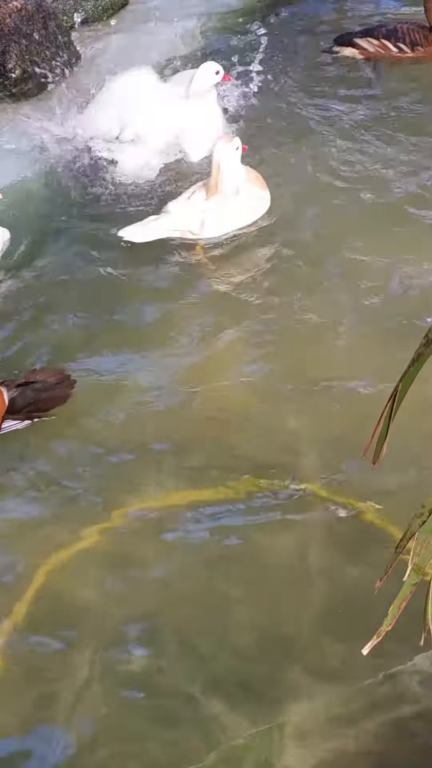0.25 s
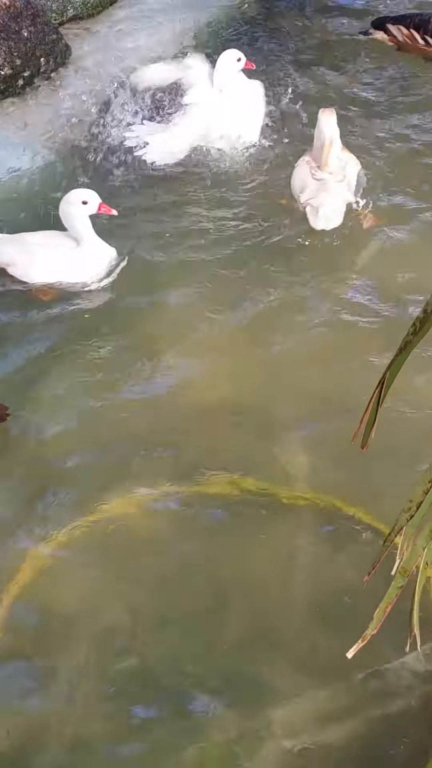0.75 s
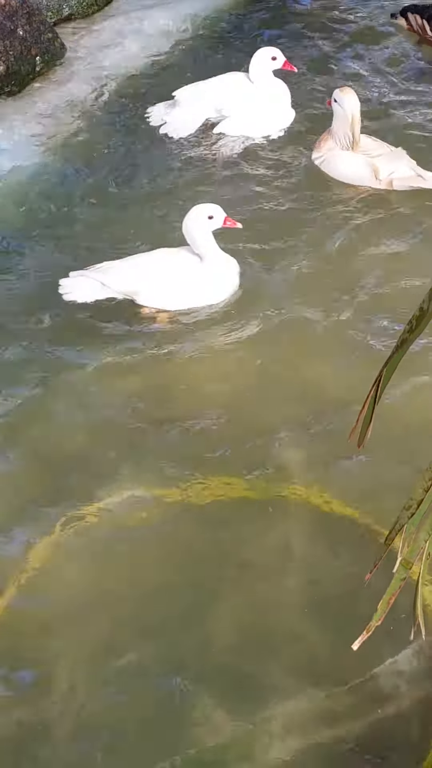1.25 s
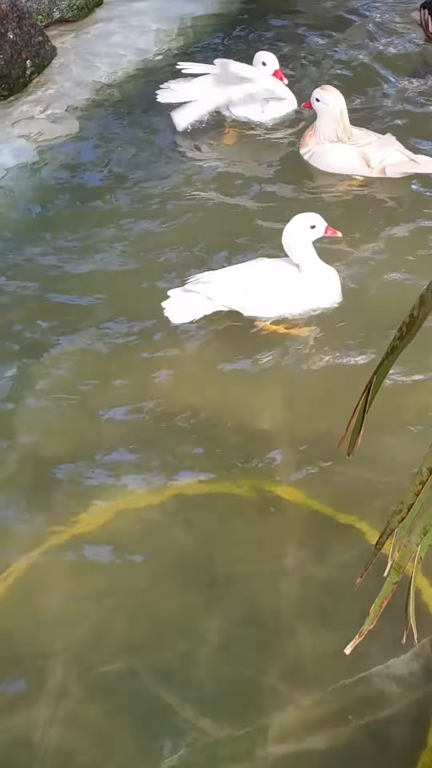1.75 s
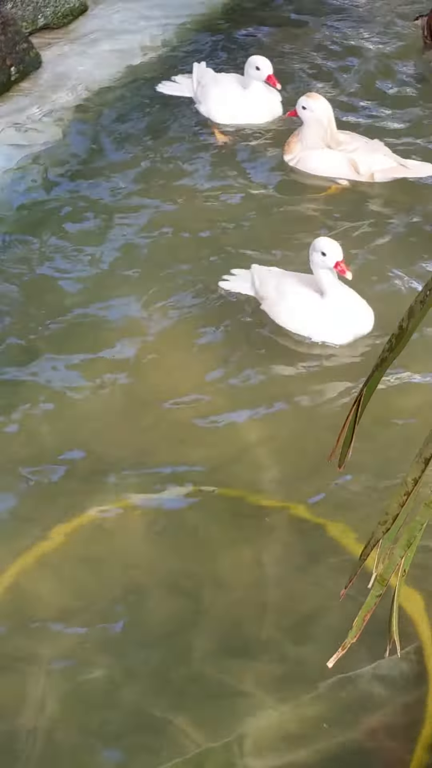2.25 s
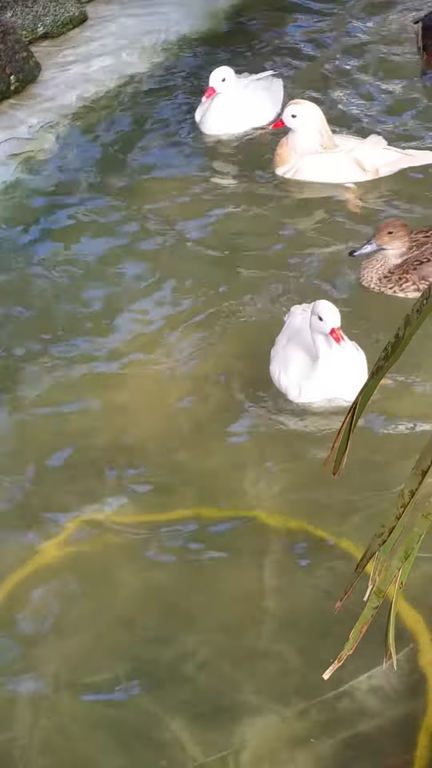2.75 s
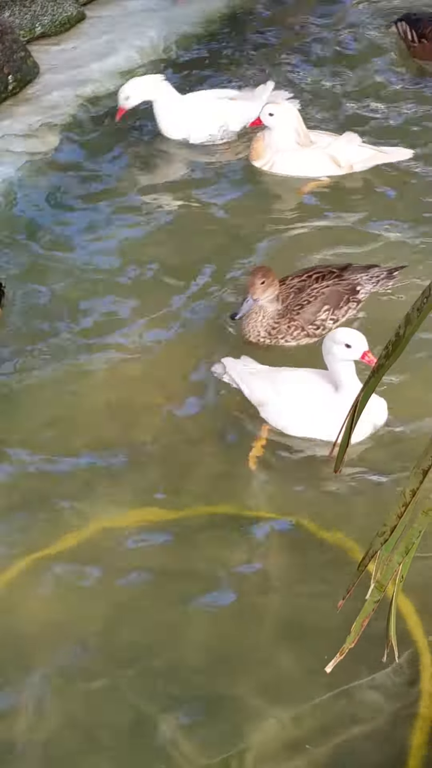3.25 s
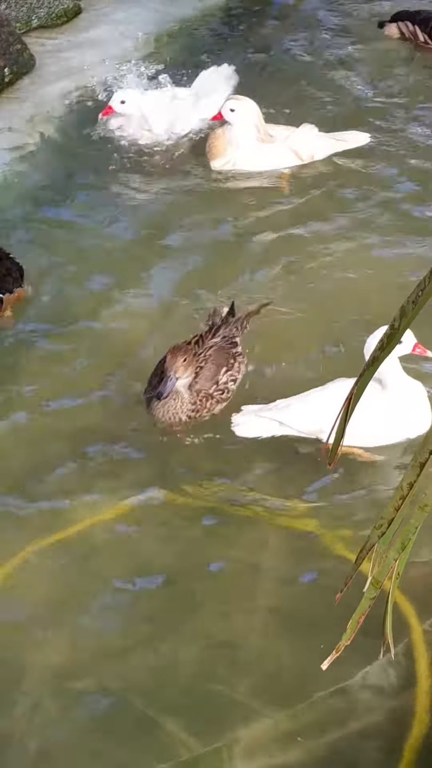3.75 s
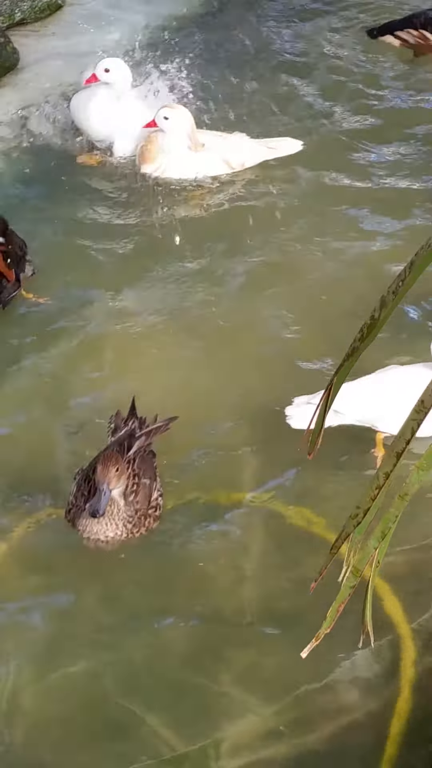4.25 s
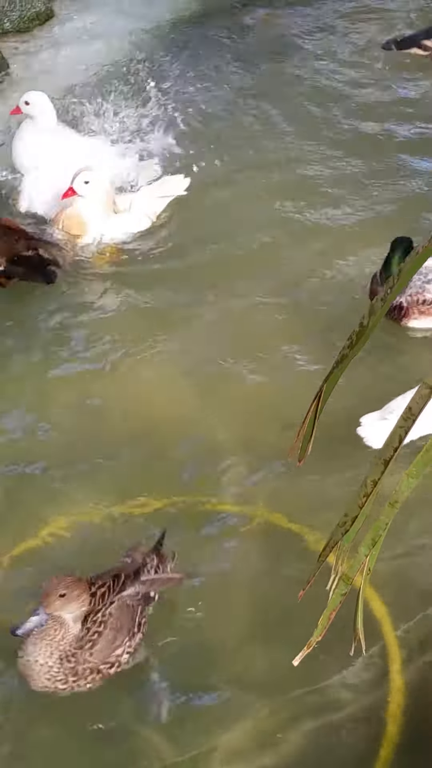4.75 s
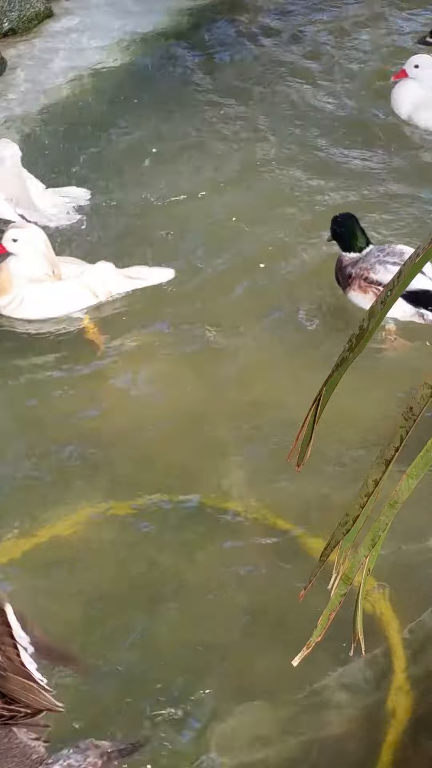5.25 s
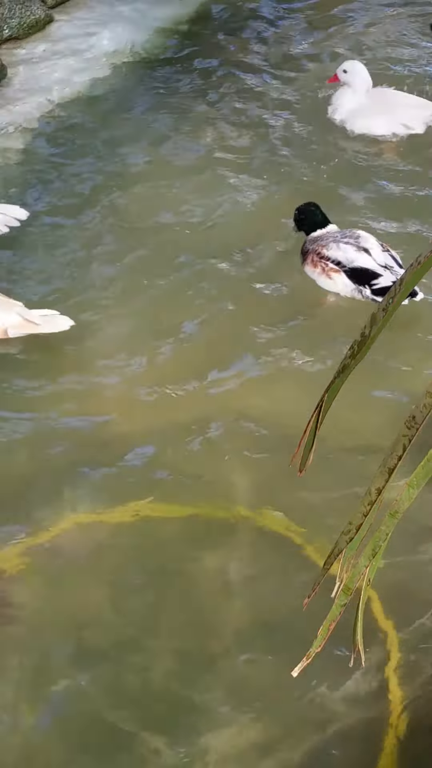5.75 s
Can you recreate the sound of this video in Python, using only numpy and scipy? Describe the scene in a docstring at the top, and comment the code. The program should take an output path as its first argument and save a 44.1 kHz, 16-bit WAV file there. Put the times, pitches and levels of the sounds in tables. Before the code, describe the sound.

Fast fluttering wing slaps splash a small pond in three bouts, bubbling and dripping between them, over short duck peeps and a low hum.

```python
"""Duck bathing in a walled pond

A duck bathes in shallow water: three bouts of wing beats, about eleven a second, slap the surface.
Each slap is enveloped noise for crack, clap, smack and spray, plus a pressure pulse and a low heave.
Drops rain back as noise ticks, and decaying, rising sines ring as bubbles, plops and gulps of air.
Other ducks peep and cluck as rasping harmonic stacks; a pump hums in wavering sines over a rumble.
Scattered echoes come from the banks, and one wall at the left returns each blow."""
import sys
import numpy as np
from scipy import signal
from scipy.fft import rfft, irfft
from scipy.io import wavfile
from scipy.ndimage import uniform_filter1d

SR = 44100
rng = np.random.default_rng(int(sys.argv[2]) if len(sys.argv) > 2 else 0)


def pcm_store(signal):
    """Save signal as 16-bit PCM."""
    levels = np.round(np.clip(np.atleast_2d(signal), -1, 1) * 32767)
    wavfile.write(sys.argv[1], SR, levels.astype(np.int16).T)


N = 264159
TIME = np.arange(N) / SR  # s

# Wing beats and flicks of water:
# (time [s], relative strength [dB], depth of the stroke [0-1], peak of its thump [dB])
WING_BEATS = [(0.002, -23, 0.61, -26), (0.0807, -15, 0.2, -22.5), (0.1679, -21, 0.48, -32),
              (0.25, -17, 0.29, -18), (0.338, -17, 0.3, -28), (0.3459, -41, 0.82, -16),
              (0.4233, -14, 0.12, -28), (0.512, -16, 0.45, -21), (0.599, -15.5, 0.3, -24),
              (0.6892, -19, 0.58, -23), (0.7809, -21, 0.53, -22), (0.8599, -38, 0.48, -12.5),
              (0.897, -29, 0.63, -30.5), (1.119, -27.5, 0.42, -27), (1.216, -37, 0, -50.5),
              (1.3632, -30, 0, -50), (1.901, -33, 0, -50), (2.247, -32, 0.66, -47),
              (2.3452, -26, 0.1, -48.5), (2.352, -30.5, 0.1, -48), (2.4087, -21.5, 0.02, -40),
              (2.5125, -15, 0.08, -26), (2.5984, -13.5, 0.16, -15.5), (2.688, -14, 0.23, -12),
              (2.7796, -14.5, 0, -27), (2.8699, -12.5, 0, -22), (2.963, -24, 0.4, -30),
              (2.9668, -14, 0.2, -22), (3.0645, -13.5, 0, -18), (3.1611, -14, .05, -23),
              (3.2545, -20.5, 0.27, -29), (3.262, -16, 0.26, -18), (3.3639, -16.5, 0.31, -22.5),
              (3.4706, -17, 0.18, -24), (3.5821, -15.5, 0.23, -17), (4.082, -26.5, 0, -45),
              (4.1845, -21, 0.63, -18), (4.2699, -19.5, 0.7, -21.5), (4.3489, -26.5, 0.87, -15),
              (4.434, -17.5, 0.27, -23), (4.516, -22.5, 0.86, -12.5), (4.603, -16.5, 0.48, -19),
              (4.681, -21, 0.67, -19), (4.7719, -13, 0.13, -29), (4.855, -14, 0.25, -31),
              (4.892, -18, 0.36, -32), (4.955, -20.5, 0.38, -36.5), (5.0667, -23, 0.43, -24),
              (5.326, -24.5, 0, -48), (5.5366, -26.5, 0.3, -35)]
# What a wing that digs in fully gains over one that skims the surface [dB]
DEEP_SMACK_DB, DEEP_SPRAY_DB, DEEP_HEAVE_DB = 16.5, 17.5, 32
# Half width of a skimming wing's pressure pulse [s], and how many times wider when it digs in fully
THUMP_S, THUMP_WIDENS = 0.00012, 10.6
WALL_S = 0.00306  # delay of the wall's echo

# Noise colours of the slap's layers, the drops and the churned water:
# (frequency [Hz], relative density [dB per Hz])
CRACK_SPECTRUM = [(100, -70), (2000, -16), (5500, -28.5), (7500, -8), (9500, -1.5), (11500, -1),
                  (14500, -10)]
CLAP_SPECTRUM = [(150, -17), (600, 0.5), (1100, 2.5), (2500, 1), (4000, -3), (6500, -2.5), (12000, -9)]
SMACK_SPECTRUM = [(50, -52), (130, 9.5), (400, -1.5), (1100, 3.5), (2400, 8), (4000, -6), (7000, 0.5),
                  (14000, -1)]
SPRAY_SPECTRUM = [(80, -6), (200, -14), (1000, -12.5), (2500, -7), (5000, -8), (7000, -6), (9000, -2),
                  (11500, 0), (14500, -9.5)]
DROP_SPECTRUM = [(100, -52), (2000, -7.5), (4000, -7), (6000, -12), (8000, -5.5), (8600, -0.5),
                 (11500, -0.5), (14500, -5.5)]
CHURN_SPECTRUM = [(30, -35), (90, -3), (180, 11.5), (400, -12.5), (1000, 3), (2300, 4), (3800, -13),
                  (6000, -15), (12000, -11)]

# The pond stirs with each bout and settles after it:
# (time [s], relative level of falling drops [dB], relative level of churning water [dB])
WATER_LEVELS = [(0.0, -32, -31.5), (0.6, -34.5, -35.5), (0.77, -36.5, -31.5), (0.9, -41.5, -43.5),
                (1.1, -51, -47.5), (1.52, -49.5, -51.5), (2.19, -45, -47.5), (2.77, -34.5, -39.5),
                (2.92, -31.5, -38.5), (3.0, -31.5, -36), (3.13, -30, -36), (3.42, -34, -39.5),
                (3.55, -38.5, -35.5), (3.74, -43, -43), (4.07, -41, -42.5), (4.37, -34.5, -32),
                (4.5, -33.5, -35.5), (4.92, -35.5, -36.5), (5.1, -39.5, -42), (5.34, -42, -44.5),
                (5.5, -42, -42.5), (5.55, -39.5, -37), (5.68, -38.5, -41), (5.99, -39.5, -39.5)]

# Hum lines of the pump, before waver and swell: (frequency [Hz], level [dB rms])
PUMP_LINES = [(118.3, -46), (183, -58.5), (225.5, -56), (239, -64), (296, -64), (591.5, -66)]
# Swell shared by the hum and the rumble: (time [s], gain [dB])
PUMP_SWELL_CURVE = [(0, -1), (1.3, -1.5), (2.3, -0.5), (3.6, -5), (4.8, 1), (5.3, -3), (5.6, 1.5), (6, 2)]
# Colour of the low rumble: (frequency [Hz], relative density [dB per Hz])
RUMBLE_SPECTRUM = [(20, 5.5), (45, 7.5), (90, 9), (160, 3.5), (250, 2.5), (400, -19), (650, -10),
                   (1000, -12), (1300, -18), (3000, -32), (8000, -63)]

# Peeps and squeaks: (time [s], length [s], level [dB], pitch mid-call [Hz], hoarseness [0-1],
# tilt of the overtones [dB per octave], depth of the rasp [ratio])
PEEP_CALLS = [(0.008, 0.07, -30, 1417, 0.15, -2.5, 0.5), (0.192, 0.069, -29, 1424, 0.25, -2, 0.68),
              (0.337, 0.047, -25, 1420, 0.7, -2, .25), (0.465, 0.053, -25.5, 1516, 0.14, -2.5, 0.38),
              (0.624, 0.058, -27, 1515, 0, -6, .35), (0.636, 0.03795, -29, 1404, .05, -10, .25),
              (2.412, 0.05, -33.5, 1310, 0.2, -19, .7), (5.258, .038, -37.5, 1403, 0.08, -28, 1.7),
              (5.878, .04, -36.5, 2080, .05, -7, 1.7)]
# Throat resonance of the peeps: (frequency [Hz], gain [dB])
PEEP_THROAT_CURVE = [(700, -25.5), (1450, -3), (2100, 0.5), (2800, 7), (3600, 8), (4300, 6.5), (5000, 6.5),
                     (5800, -1), (7500, -11), (9000, 9.5), (10000, -16)]
PEEP_TILT_HZ = 2747.4  # the tilt acts above this
CLUCK_S, CLUCK_LENGTH_S, CLUCK_DB, CLUCK_HZ = 2.002, .043, -32, 365  # pitch and level at its start
CLUCK_SAG, CLUCK_FADE_DB = 0.2327, 26  # share of its pitch, and level, that the cluck loses by its end
# Throat resonance of the cluck: (frequency [Hz], gain [dB])
CLUCK_THROAT_CURVE = [(350, 2.5), (760, 7.5), (1130, 3), (1550, -10), (2300, -31.5), (3500, -43.5)]

# Large pockets of air that the water closes over:
# (time [s], level [dB], starting pitch [Hz], splash around it relative to the level [dB])
PLOP_POCKETS = [(0.128, -23, 968.3, -1), (0.130, -24, 2200, -9), (0.181, -18.5, 792.5, 1),
                (0.292, -26, 652.5, -1), (0.344, -20.5, 773, -15), (0.345, -15, 610, -6),
                (0.455, -22.5, 653, 0), (0.520, -25.5, 296.8, -6), (0.598, -16, 2210, -16),
                (0.611, -22, 179.7, -3.5), (0.615, -25, 567, -13), (0.689, -18, 2370, 0),
                (0.781, -25, 270, -4.5), (0.783, -22.5, 1810, -8.5), (0.852, -22, 2090, -6),
                (0.859, -24.5, 587.7, -11), (0.860, -27, 222, -1), (0.861, -19.5, 928.7, -25),
                (0.880, -23, 828.8, -22), (1.073, -20.5, 1597, -15), (1.104, -17.5, 325.5, -13.5),
                (1.106, -24.5, 1262, -16), (1.141, -36, 1650, -1), (1.145, -29, 1220, -11),
                (1.809, -38, 2013, -2), (1.915, -32, 2144, -9.5), (2.073, -39, 1110, -7),
                (2.129, -29, 1100, -5.5), (2.132, -34, 2200, -6), (2.192, -38, 2400, 1),
                (2.272, -33.5, 1610, -5), (2.597, -25, 951.4, -23.5), (2.655, -26.5, 1089, -1),
                (2.748, -25, 950, -3), (2.779, -31.5, 232, -16), (2.838, -32, 1180, -6),
                (2.945, -30.5, 415, 5), (2.967, -18, 2260, -9.5), (3.004, -27.5, 462.9, -3.5),
                (3.019, -27, 1437, -2), (3.039, -26.5, 1010, -1), (3.049, -23, 139.4, -6.5),
                (3.063, -29, 860.7, -6), (3.090, -25, 2330, -18), (3.161, -23.5, 2370, -2),
                (3.341, -29, 1030, 1.5), (3.434, -26, 3170, 1.5), (3.520, -32, 1080, -10),
                (3.581, -22.5, 1097, -14), (3.645, -32.5, 560, 0.5), (3.665, -35, 896.6, -2),
                (4.300, -26.5, 942.8, -5.5), (4.380, -20, 590, -5), (4.391, -19, 1026, -7),
                (4.393, -24.5, 2309, -10), (4.540, -25, 2150, -3), (4.605, -26, 530, -4),
                (4.635, -24.5, 1094, 0.5), (4.681, -25, 654.9, -10), (4.715, -28, 597, -5.5),
                (4.717, -23, 997.4, -2), (4.719, -25, 1470, -6), (4.888, -13, 633, -12),
                (4.894, -23.5, 1550, -4), (4.903, -19.5, 640, -10), (4.990, -28.5, 606, 4),
                (5.002, -27.5, 446, -6), (5.064, -21, 1015, -5), (5.109, -32.5, 1070, 2),
                (5.410, -35, 356.5, 3), (5.556, -31, 690, -2), (5.578, -29, 885, -4),
                (5.594, -34, 760, -7.5), (5.803, -33.5, 370, -1), (5.828, -32, 1350, -11.5),
                (5.882, -31, 2380, -3), (5.902, -35, 1790, 4), (5.940, -33, 1420, 3.5),
                (5.967, -27, 440, -1.5)]
RING_S, RING_SLOPE = 0.038, 0.5575  # t60 of a 1 kHz bubble, and the power by which it grows with size

# Pockets of air held under the duck as it settles:
# (time [s], length [s], level [dB], starting pitch [Hz], share by which the pitch climbs [ratio])
GULP_POCKETS = [(1.071, 0.032, -30, 1007, .02), (1.11, 0.048, -30, 1097, 0.13),
                (1.135, 0.07, -34, 262, 0.6), (1.15, 0.042, -42, 1136, 0.1157),
                (1.181, 0.0352, -41, 593.7, 0.2675), (1.205, .04, -40.5, 1134, 0.0396)]

# Likeness of the noise at the two ports: (frequency [Hz], left-right correlation [0-1])
PORT_LIKENESS = [(60, .98), (200, .96), (500, .6), (1000, .4), (2000, .15), (8000, 0)]
# Colour of the two microphone ports: (frequency [Hz], left minus right [dB])
PORT_COLOUR = [(300, 1), (1200, 0.5), (2500, -3), (3700, -1), (5200, -2.5), (6600, -1), (8300, 11),
               (9500, 10.5), (10600, -3.5), (12000, -3.5), (14500, -6)]
# Where the bathing duck is: (time [s], lag of the left port behind the right [s])
BATHER_BEARING = [(0, -7e-5), (1, -7e-5), (2, 4.5e-5), (3.7, 4.5e-5), (4.2, -7e-5)]
LOW_CUT_HZ, EDGE_HZ = 42, 14600  # band that the microphone passes


def amp(db):
    """Decibels to gain."""
    return 10 ** (np.asarray(db) / 20)


def unit(x):
    """Scales to rms 1."""
    return x / np.sqrt(np.mean(x ** 2) + 1e-20)


def read(points, hz):
    """Reads a spectrum table on a log-frequency axis."""
    f, value = np.transpose(points)
    return np.interp(np.log(hz + 1), np.log(f), value)


def add(mix, s, sound):
    """Mixes a sound in at time s."""
    part = mix[:, max(round(s * SR), 0):][:, :sound.shape[-1]]
    part += sound[..., :part.shape[-1]]


def colour(x, spectrum):
    """Shapes a white pair, keeping its power; the bass reaches both ports nearly alike."""
    hz = np.fft.rfftfreq(N, 1 / SR)
    left, other = rfft(x)
    same = np.clip(read(PORT_LIKENESS, hz), -1, 1)
    right = same * left + np.sqrt(1 - same ** 2) * other
    return irfft(np.array([left, right]) * unit(amp(read(spectrum, hz))), N)


def patchy(x, depth_db):
    """Clumps of water land at random, each favouring its own band for a moment."""
    z = signal.stft(x, nperseg=256)[2]
    clumps = uniform_filter1d(rng.standard_normal(z.shape[1:]), size=6, axis=0)  # over frequency
    clumps = unit(uniform_filter1d(clumps, size=7, axis=1))  # over time
    return signal.istft(z * amp(depth_db * clumps), nperseg=256)[1][:, :N]


def patter(per_s, spread_db, hiss):
    """Ticks of drops of many sizes over the hiss of the finest mist."""
    landing = rng.random(N) < per_s / SR
    size = amp(spread_db * np.minimum(rng.exponential(1, N), 4)) * landing
    tick_s = 0.00017  # decay of each drop's power
    power = signal.lfilter([1], [1, -np.exp(-1 / (tick_s * SR))], size ** 2)
    envelope = unit(np.sqrt(power)) + hiss
    return unit(patchy(envelope * rng.standard_normal((2, N)), 2.4))


def attack_decay(t, peak_s):
    """A strike that swells to 1 at peak_s and dies away."""
    return t / peak_s * np.exp(1 - t / peak_s)


def suction(u):
    """A sharp dip of pressure between two shallow swells; u is time in half widths."""
    return (u ** 2 - 1) / (1 + u ** 2) ** 2


def shove(t, hz):
    """One heavy swing of pressure from displaced water."""
    return np.sin(2 * np.pi * hz * t) * 2 * hz * t * np.exp(1 - 2 * hz * t)


def from_bather(x):
    """Direct sound reaches the nearer port first."""
    lag = np.round(np.interp(TIME, *np.transpose(BATHER_BEARING)) * SR).astype(int)
    return np.array([x[np.clip(np.arange(N) - lag, 0, N - 1)], x])


def wings(crack_db=-1.0, clap_db=-5, smack_db=-16, heave_db=-33, spray_db=-16,
          crack_s=0.00067516, clap_s=0.00026, smack_s=0.0027, brush_db=-9, brush_s=0.004,
          spray_s=0.042, heave_hz=185, thump_echo=0.17):
    """Each wing claps, cracks, brushes, thumps a hollow and flings spray; deeper strokes move more water."""
    crack, clap, smack, spray, thumps, heave = np.zeros((6, 1, N))
    t = np.arange(SR // 3) / SR
    for s, db, depth, thump_db in WING_BEATS:
        depth = np.clip(depth, 0, 1)
        add(crack, s, amp(db) * attack_decay(t, crack_s))
        add(clap, s, amp(db) * attack_decay(t, clap_s))
        add(smack, s - .001, amp(db + DEEP_SMACK_DB * depth) * attack_decay(t, smack_s))
        sheet = (1 - np.exp(-t / 0.00159)) * np.exp(-(t / spray_s) ** 2.0)
        add(spray, s, amp(db + DEEP_SPRAY_DB * depth) * sheet)
        # the brush swells and fades around a peak just after the slap
        crack += amp(db + brush_db) * np.exp(-abs(TIME - s - brush_s) / brush_s)
        half_width = THUMP_S * THUMP_WIDENS ** depth
        thumps += amp(thump_db) * suction((TIME - s - crack_s) / half_width)
        size = rng.uniform(.75, 1.25)
        add(heave, s - .002, amp(db + DEEP_HEAVE_DB * depth + heave_db) * shove(t, heave_hz / size))
    cracks = amp(crack_db) * colour(crack * rng.standard_normal((2, N)), CRACK_SPECTRUM)
    claps = amp(clap_db) * colour(clap * rng.standard_normal((2, N)), CLAP_SPECTRUM)[0]
    blows = from_bather(thumps[0] + claps)
    echo = np.array([[.8], [.45]])  # a wall to the left echoes each blow
    add(cracks, WALL_S, (cracks + thump_echo * blows) * echo)
    smacks = amp(smack_db) * colour(smack * rng.standard_normal((2, N)), SMACK_SPECTRUM)
    sprays = amp(spray_db) * colour(spray * patter(2200, 2.547, 1.0), SPRAY_SPECTRUM)
    return cracks + blows + smacks + sprays + heave


def bubble(hz, t60, rise):
    """A bubble rings and rises in pitch as it nears the surface."""
    t = np.arange(int(t60 * SR) + 2) / SR
    ring = np.sin(2 * np.pi * hz * t * (1 + rise * t / t60))
    return ring * amp(-60 * t / t60) * (1 - np.exp(-2 * hz * t))


def ring_time(hz):
    """Larger, lower bubbles ring longer."""
    return RING_S * (1000 / hz) ** RING_SLOPE


def placed(sound):
    """Gives a sound a random side and arrival lag."""
    pan, lag = rng.uniform(-.4, .4), rng.integers(0, 9, 2)  # lag in samples
    left = (1 + pan) * np.pad(sound, (lag[0], lag[1]))
    right = (1 - pan) * np.pad(sound, (lag[1], lag[0]))
    return np.array([left, right])


def bubbling(per_s, cycles, count=32):
    """Many small bubbles of all pitches, a few of them loud; per_s counts those near each pitch."""
    out = np.zeros((2, N))
    for hz in np.geomspace(280, 2900, count):
        for when, size, detune in rng.random((int(per_s * N / SR), 3)):
            gain = (size + .04) ** -.5 * (hz / 1000) ** .5
            ring = bubble(hz * (0.967 + 0.12 * detune), cycles / hz, 0.08095)
            add(out, when * N / SR, gain * placed(ring))
    return unit(out)


def water(drops_db=3.5, wash_db=-4.0, bubbles_db=-7.0, gurgle_db=-28, gurgle_s=0.0508,
          spread_s=0.001583):
    """Drops rain back on the pond, the churned water washes, and the hollow of each beat gurgles shut."""
    s, *levels = np.transpose(WATER_LEVELS)
    falling, churning = (amp(np.interp(TIME, s, level)) for level in levels)
    t = np.arange(SR // 5) / SR
    closing = np.zeros((1, N))
    for beat_s, db, depth, thump_db in WING_BEATS:
        add(closing, beat_s, amp(db + gurgle_db) * np.exp(-((t - gurgle_s) / spread_s) ** 2))
    bubbles = (closing + amp(bubbles_db) * churning) * bubbling(11, 30)
    wash = amp(wash_db) * churning * colour(patter(800, 3.4, .5), CHURN_SPECTRUM)
    drops = amp(drops_db) * falling * colour(patter(1500, 1.069, 1.0), DROP_SPECTRUM)
    return drops + wash + bubbles


def pump(rumble_db=-48, waver=0.2):
    """Hum lines waver in level and phase over a low rumble, swelling together."""
    knots = np.arange(0, 7, 1 / 8)  # s
    hum = 0
    for hz, db in PUMP_LINES:
        drift, swell = (waver * np.interp(TIME, knots, row) for row in rng.standard_normal((2, len(knots))))
        line = np.sin(2 * np.pi * (hz * TIME + rng.random()) + 2 * drift)
        hum = hum + amp(db) * np.sqrt(2) * (1 + swell / 2) * line
    rumble = amp(rumble_db) * colour(rng.standard_normal((2, N)), RUMBLE_SPECTRUM)
    return (hum + rumble) * amp(np.interp(TIME, *np.transpose(PUMP_SWELL_CURVE)))


def syrinx(hz, throat, hoarse, jitter, rasp_depth, count=16):
    """A harmonic stack quavers and rasps through a throat; hoarseness adds lines half way between."""
    wobble, shimmer = unit(uniform_filter1d(rng.standard_normal((2, len(hz))), 50))
    quaver = unit(uniform_filter1d(rng.standard_normal(len(hz)), 300))
    turns = np.cumsum(hz * (1 + jitter * (wobble + quaver / 2))) / SR
    orders = np.arange(1, count + 1) / 2
    rasp = 1 + rasp_depth * unit(uniform_filter1d(rng.standard_normal((count, len(hz))), 120))
    stack = 0
    for k, roughness in zip(orders, rasp):
        strength = hoarse if k % 1 else 1
        resonance = amp(read(throat, k * hz))
        stack = stack + strength * resonance * roughness * np.cos(2 * np.pi * k * turns)
    return unit(stack * amp(2 * shimmer))


def ducks(arch=0.0623, rise=0.014, jitter=.012):
    """Short, rough, arched peeps, and one low cluck that sags as it fades."""
    out = np.zeros((2, N))
    for s, length, db, hz, hoarse, tilt_db, rasp in PEEP_CALLS:
        u = np.linspace(-1, 1, int(length * SR))
        pitch = hz * (1 + rise * u - arch * u ** 2)
        throat = [(f, level + tilt_db * np.log2(max(f / PEEP_TILT_HZ, 1))) for f, level in PEEP_THROAT_CURVE]
        peep = (1 - u ** 2) * syrinx(pitch, throat, hoarse, jitter, rasp)
        add(out, s, amp(db) * placed(peep))
    fade = np.linspace(0, 1, int(CLUCK_LENGTH_S * SR)) ** 3
    cluck = syrinx(CLUCK_HZ * (1 - CLUCK_SAG * fade), CLUCK_THROAT_CURVE, 0.1718, jitter, 0.36)
    cluck = cluck * signal.windows.tukey(len(fade), .05)
    add(out, CLUCK_S, amp(CLUCK_DB - CLUCK_FADE_DB * fade) * cluck)
    return out


def drips(tick_db=-34, ring_db=-39, range_db=9, tick_s=0.0011, low_hz=700, high_hz=2700, count=36):
    """Stray drops fall from feathers and bills: a tick and a small ringing bubble."""
    out, ticks = np.zeros((2, N)), np.zeros((1, N))
    t = np.arange(SR // 50) / SR
    for k, (when, size, pitch) in enumerate(rng.random((count, 3))):
        s = (k + when) / count * N / SR  # one drop in each equal slot of time
        hz = low_hz * (high_hz / low_hz) ** pitch
        add(ticks, s, amp(tick_db - range_db * size) * np.exp(-t / tick_s))
        add(out, s, amp(ring_db - range_db * size) * placed(bubble(hz, ring_time(hz), 0.0735)))
    return out + colour(ticks * rng.standard_normal((2, N)), CRACK_SPECTRUM)


def plops(count=6, scatter_s=0.046, rise=0.07, slop_db=-8.0, slop_s=0.019):
    """The water slops shut, a main bubble rings, and others, higher or lower, break just after."""
    out, slop = np.zeros((2, N)), np.zeros((1, N))
    t = np.arange(SR // 5) / SR
    for s, db, hz, splash_db in PLOP_POCKETS:
        add(out, s, amp(db) * placed(bubble(hz, ring_time(hz), rise)))
        add(slop, s, amp(db + splash_db + slop_db) * np.exp(-t / slop_s))
        for late, octaves, size in rng.random((count, 3)):
            # scattered around a pitch half way, in octaves, from the main bubble to 1 kHz
            pitch = np.sqrt(hz * 1000) * 2 ** (1.857 * (octaves - .5))
            gain = amp(db + splash_db - 3.0 - 3.8 * size)
            add(out, s + scatter_s * late ** 2, gain * placed(bubble(pitch, .012 + 12 / pitch, rise)))
    return out + colour(slop * patter(980, 1.646, 0.625), SMACK_SPECTRUM)


def gulps(swell=0.31):
    """Trapped air hums while it is held down and glides up as it escapes."""
    out = np.zeros((2, N))
    for s, length, db, hz, climb in GULP_POCKETS:
        u = np.linspace(0, 1, int(length * SR))
        turns = np.cumsum(hz * (1 + climb * u ** 3)) / SR
        envelope = np.minimum(u / swell, 1) * (1 - u) ** 1.023
        add(out, s, amp(db) * placed(envelope * np.sin(2 * np.pi * turns)))
    return out


def enclosure(x, wet_db=-11, t60=0.19):
    """Scattered, decaying echoes from the banks, which are too small to throw back the bass."""
    t = np.arange(SR // 2) / SR
    hits = rng.random((2, len(t))) < 2000 / SR  # about 2000 echoes a second
    taps = rng.standard_normal((2, len(t))) * hits * (t > .008) * amp(-60 * t / t60)
    taps = signal.lfilter(*signal.butter(2, 200, "high", fs=SR), taps)
    echoes = signal.fftconvolve(x, taps / np.linalg.norm(taps[0]), axes=1)[:, :N]
    return x + amp(wet_db) * echoes


def scene():
    """Bathing, calls and pump together; the plops and calls echo more."""
    splashing = enclosure(wings() + water() + drips(), wet_db=-8, t60=0.12)
    calls = enclosure(ducks(), wet_db=-5.5, t60=0.2)
    pockets = enclosure(plops() + gulps(), wet_db=-5, t60=0.26)
    return splashing + pockets + calls + pump()


def record(dry):
    """Each port colours the sound its own way; then the low cut and the band limit."""
    hz = np.fft.rfftfreq(N, 1 / SR)
    ratio = amp(read(PORT_COLOUR, hz))
    ports = np.array([ratio, np.ones_like(ratio)]) * np.sqrt(2 / (1 + ratio ** 2))  # keeps summed power
    ports *= 1 / (1 + (LOW_CUT_HZ / (hz + 1)) ** 4) ** .5
    low_pass = signal.firwin(401, EDGE_HZ, window=("kaiser", 7), fs=SR)
    return signal.oaconvolve(irfft(rfft(dry) * ports, N), low_pass[None], "same", axes=1)


dry = scene()
out = record(dry)
pcm_store(out)
```